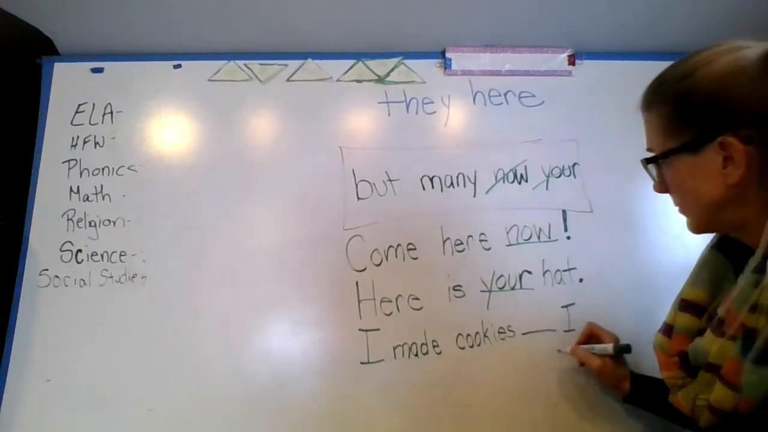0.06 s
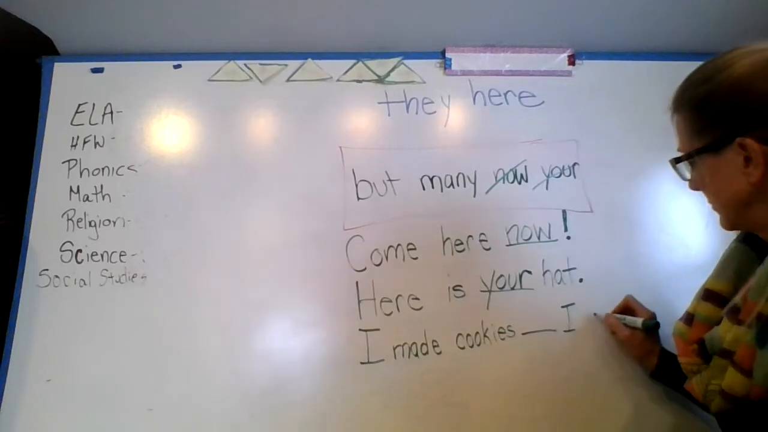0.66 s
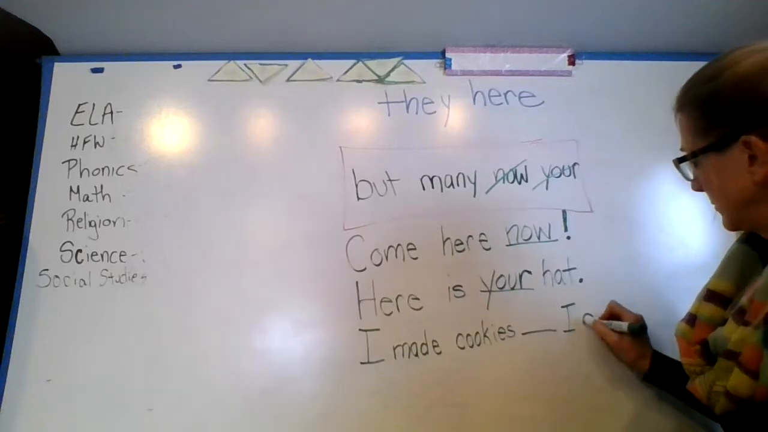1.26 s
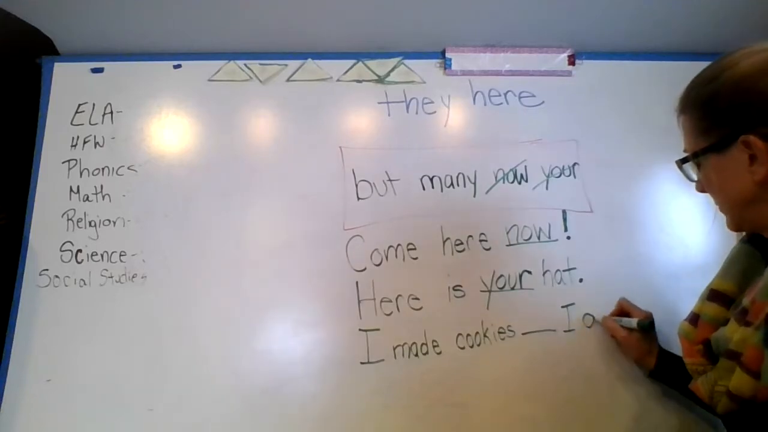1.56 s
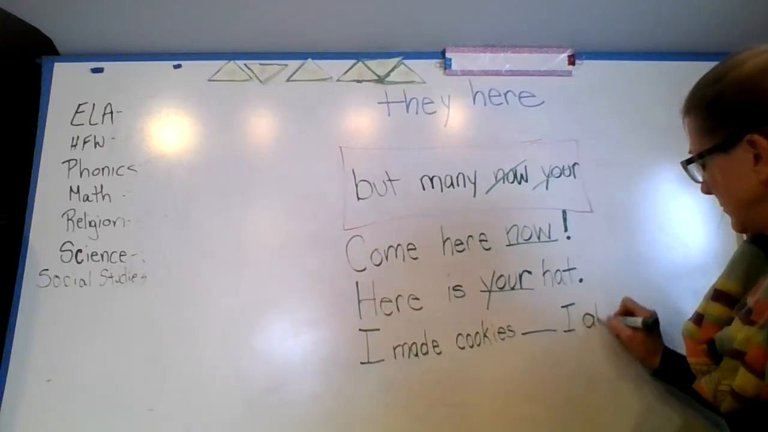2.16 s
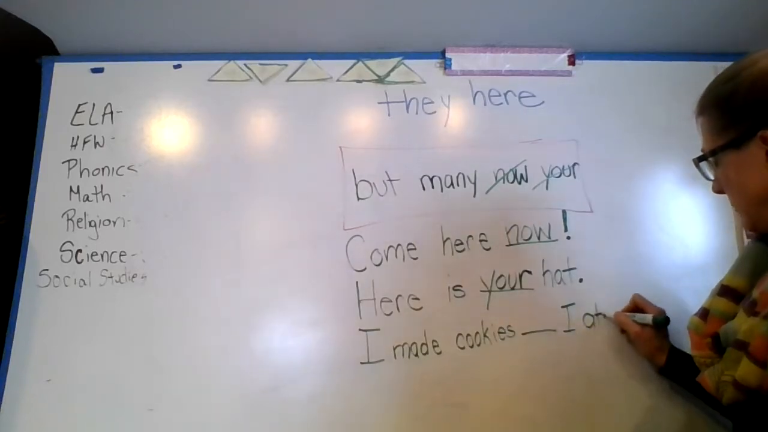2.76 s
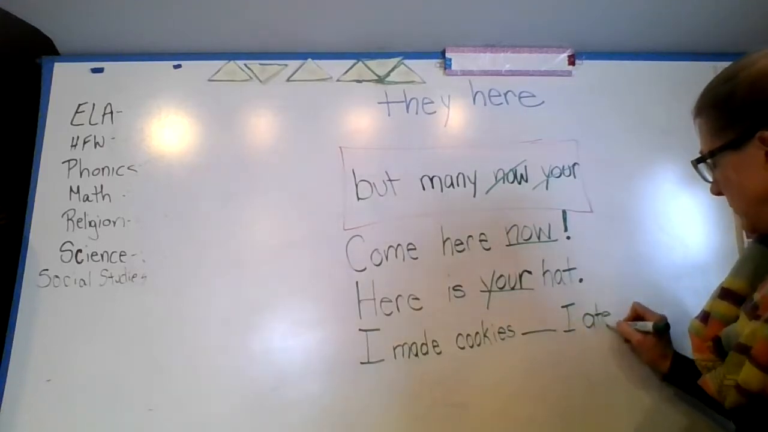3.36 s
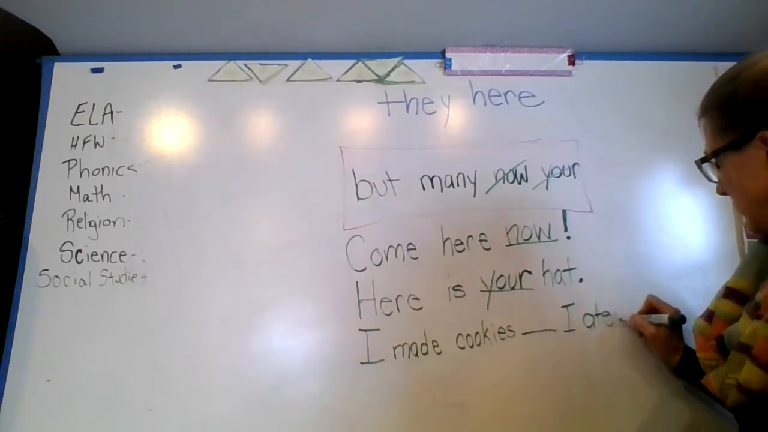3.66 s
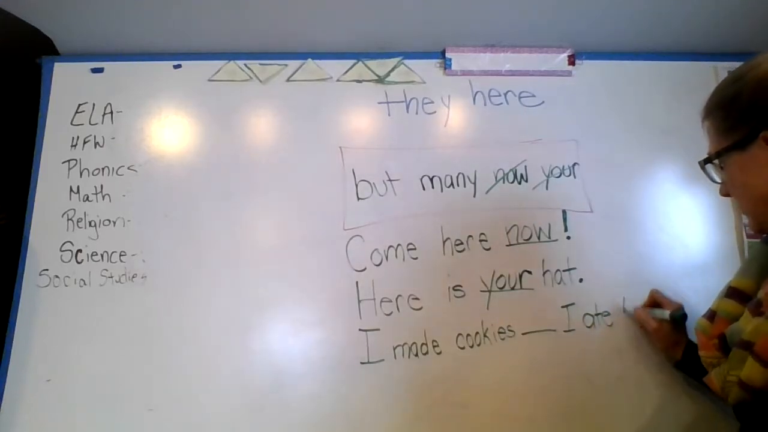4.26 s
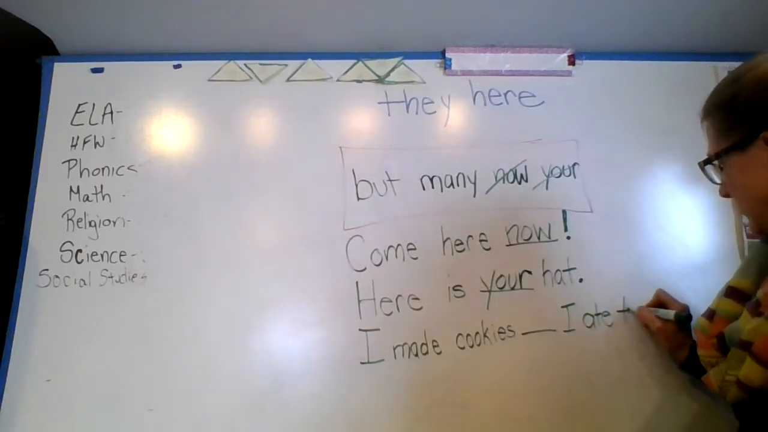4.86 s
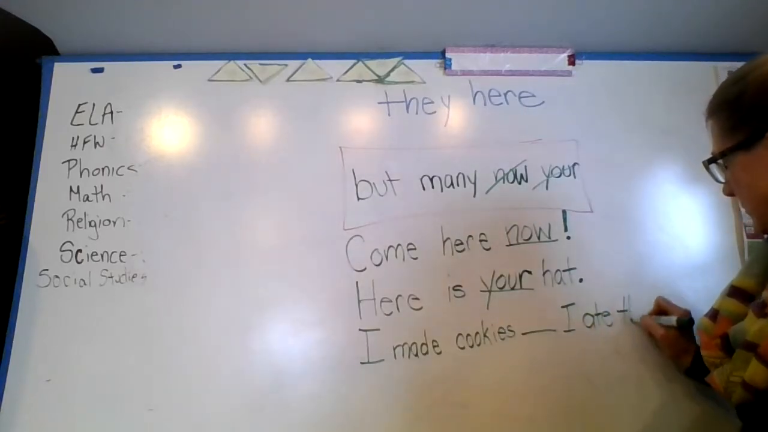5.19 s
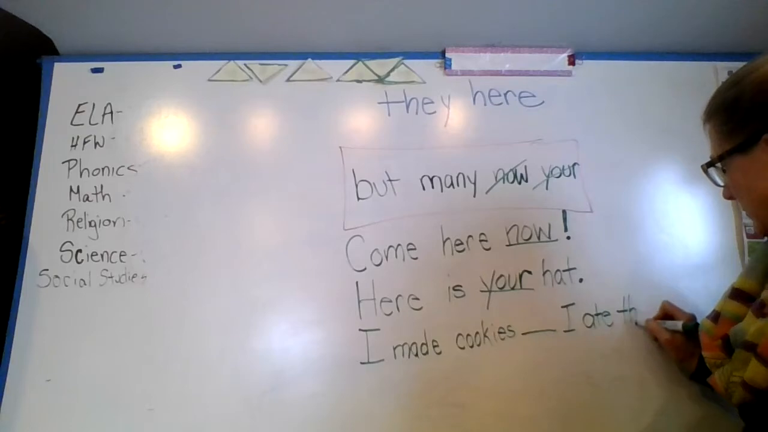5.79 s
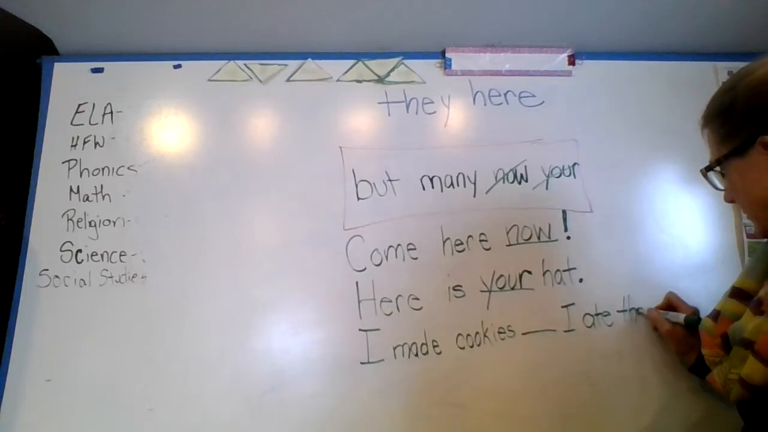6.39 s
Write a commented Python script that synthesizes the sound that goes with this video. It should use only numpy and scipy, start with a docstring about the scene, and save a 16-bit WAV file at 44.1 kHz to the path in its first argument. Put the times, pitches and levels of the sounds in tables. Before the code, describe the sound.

Soft knocks, felt-tip scratching and thin squeaks come from a marker writing on a whiteboard, against quiet room rumble and hiss.

```python
"""A dry-erase marker writes a few letters on a wall whiteboard, heard through a small microphone.
Over low room rumble and microphone hiss, a faint swell of background hiss near 2.5 kHz opens. The felt
tip rubs through a first stroke and catches with a tick. At 0.7 s a landing thumps the panel and a thin
stick-slip squeak follows. Strokes, landings and squeaks run on, the hand brushing and bumping the board;
at 4.7 s the tip lifts with a click, and the last stroke brakes at about 6.4 s."""
import sys
import numpy as np
from scipy import signal
from scipy.fft import rfft, irfft, next_fast_len
from scipy.io import wavfile

SR = 44100
rng = np.random.default_rng(int(sys.argv[2]) if len(sys.argv) > 2 else 0)


def int16_out(signal):
    """Quantize to a 16-bit WAV file."""
    q = np.round(np.clip(np.atleast_2d(signal).T, -1, 1) * 32767)
    wavfile.write(sys.argv[1], SR, q.astype(np.int16))


N = 287973
TIME = np.arange(N) / SR


def amp(db):
    return 10 ** (np.asarray(db) / 20)


def unit_rms(x):
    return x / np.sqrt(np.mean(x ** 2) + 1e-20)


def curve_at(points, hz):
    """Joins (f/Hz, value) breakpoints on a log-frequency axis."""
    f, value = np.transpose(points)
    return np.interp(np.log(hz + 1), np.log(f + 1), value)


def equalise(x, points):
    """Shapes x with an EQ curve, at rms 1."""
    size = next_fast_len(N)
    gain = amp(curve_at(points, np.fft.rfftfreq(size, 1 / SR)))
    return unit_rms(irfft(rfft(x, size) * gain, size)[:N])


def wander(hz):
    """A random LFO of rms 1, moving mostly below hz."""
    knots = rng.standard_normal(size=4096)
    return unit_rms(np.interp(2 * hz * TIME, np.arange(len(knots)), knots))


def resonate(x, hz, width_hz):
    """One resonance applied twice for steep skirts, at rms 1."""
    pole = np.exp((2j * np.pi * hz - np.pi * width_hz) / SR)
    return unit_rms(signal.lfilter([1], np.poly([pole, pole]), x).real)


def swell(peak_s, rise_s, fall_s, sharpness=1.29):
    """An envelope from rest up to 1 and back to rest."""
    return np.interp(TIME, [peak_s - rise_s, peak_s, peak_s + fall_s], [0, 1, 0]) ** sharpness


def add(mix, start_s, sound):
    part = mix[max(round(start_s * SR), 0):][:len(sound)]
    part += sound[:len(part)]


# EQ curves of the room rumble and the microphone hiss: f/Hz, gain/dB
RUMBLE_EQ = [(15, -5), (30, 2), (47, 1), (70, -8), (92, -5.5), (115, -15), (145, -20.5), (170, -30.5),
             (215, -39.5), (270, -25), (400, -28.5), (700, -34.5), (2000, -50.5)]
HISS_EQ = [(100, -7), (400, -6), (1000, 2.5), (1900, 2.5), (2700, 2.5), (3600, 0.5), (6000, 0.2),
           (11000, 0.5), (15500, 2)]


def room_tone(rumble_db=-55.0, hiss_db=-69.5, waver_db=1.43):
    """The bed: a low rumble that wavers slightly in level, under the microphone's even hiss."""
    rumble = equalise(rng.standard_normal(N), RUMBLE_EQ) * amp(waver_db * wander(hz=4.5))
    hiss = equalise(rng.standard_normal(N), HISS_EQ)
    return amp(rumble_db) * rumble + amp(hiss_db) * hiss


# a swell of background hiss (first row), then hand slides: peak t/s, half length/s, level/dB, centre f/Hz
NOISE_SWELLS = [(.35, .4, -82.5, 2470), (.9, .2, -85, 740), (2.8, 0.5, -78, 646), (5.28, 0.42, -76, 842),
                (6.088, 0.37, -76, 755)]


def soft_swells(relative_width=0.99):
    """Broad noise: the background hiss lifts faintly near 2.5 kHz; later, hand and sleeve brush by."""
    out = np.zeros(N)
    for peak_s, half_s, db, hz in NOISE_SWELLS:
        band = resonate(rng.standard_normal(N), hz, relative_width * hz)
        out += amp(db) * swell(peak_s, half_s, half_s) * band
    return out


# decay of the room by band: f/Hz, t60/s
ROOM_DECAY = [(60, 0.47), (140, 0.92), (300, 0.24), (600, 0.23), (2000, 0.33), (8000, 0.16)]


def room_reverb(x, fade_in_s=0.026):
    """The room answers with a diffuse tail, each band dying at its own speed."""
    hz, t, bands = signal.stft(rng.standard_normal(SR), SR, nperseg=512)
    decay = amp(-60 * t / curve_at(ROOM_DECAY, hz)[:, None])
    tail = signal.istft(bands * decay, SR, nperseg=512)[1]
    tail *= np.minimum(np.arange(len(tail)) / SR / fade_in_s, 1) ** 2
    return signal.fftconvolve(x, tail / np.linalg.norm(tail))[:N]


def fibre_snaps(per_s, spread_db):
    """Felt fibres snap free one after another: a dense grain of tiny, uneven clicks."""
    size = amp(spread_db * np.minimum(rng.exponential(1, N), 4))
    return size * rng.standard_normal(N) * (rng.random(N) < per_s / SR)


def shifting_ring(x, modes, swing_db=3):
    """Resonances take turns at random, as when the tip changes angle and place."""
    return unit_rms(sum(amp(db + swing_db * wander(hz=9)) * resonate(x, hz, width_hz)
                        for hz, width_hz, db in modes))


# the few pitches at which the tip can stick and slip
LOWEST_HZ, LOW_HZ, MID_HZ, HIGH_HZ, TOP_HZ = 2443, 2880, 6200, 8000, 10020
STROKES = [(.48, .12, -77.5, -95, None), (.8, 0.14, -86, -76.5, LOWEST_HZ), (.91, .11, -75, -74.5, LOW_HZ),
           (1.001, 0.084, -77.5, -79, HIGH_HZ), (1.145, 0.088, -68.5, -86, HIGH_HZ),
           (1.38, 0.2, -72, -80, HIGH_HZ), (1.935, 0.25, -73, -77, TOP_HZ), (2.33, 0.19, -82, -76, None),
           (2.709, .05, -80, -75, None), (2.85, 0.097, -86, -75.5, None),
           (3.008, .1, -73.5, -80.5, LOWEST_HZ), (3.11, 0.12, -78, -76, None),
           (3.194, 0.072, -74.5, -80, None), (4.065, 0.25, -71, -78, MID_HZ), (4.49, 0.14, -80, -75, None),
           (4.921, .22, -71.5, -78, MID_HZ), (5.285, 0.12, -75, -82, MID_HZ),
           (5.495, 0.17, -69.5, -85, None), (5.86, 0.1, -77.5, -72.5, MID_HZ),
           (6.15, 0.16, -74, -85.5, TOP_HZ), (6.254, 0.12, -79, -75.5, TOP_HZ),
           (6.335, 0.045, -77, -77.5, None)]
# EQ curves of the panel's rub and the felt's hiss: f/Hz, gain/dB
PANEL_EQ = [(150, -7), (350, 3), (680, 4.5), (950, -2.5), (1250, 4.5), (1500, -3), (1750, -6.5), (2500, -3),
            (3300, -7.5), (4100, -2), (5200, -5.5), (9000, -8)]
FELT_EQ = [(2000, -6.5), (4000, -5), (5200, -9), (6200, -5.5), (7000, -5), (7900, -4), (9000, -2.5),
           (9900, -6.5), (11000, -4), (12500, -23), (14200, -4.5), (16000, -13)]
# resonances that rubbing excites in the panel's skin and the marker: f/Hz, width/Hz, relative level/dB
SKIN_MODES = [(650, 180, 3), (973, 205, 1.5), (1502, 120, 2), (2034, 114, 0.5), (2550, 49, -5),
              (2880, 380, -3.5), (4070, 360, -16)]
MARKER_MODES = [(6440, 290, -12), (7750, 240, -2.5), (8470, 240, -7.5), (9340, 290, -2), (9950, 900, 0.5)]


def felt_rubbing(panel_trim_db=1.4, felt_trim_db=1.0, skin_db=-4, marker_db=-10, judder_db=0.9,
                 brake_s=0.074, panel_lag_s=.012):
    """Each stroke speeds up and brakes; the fibres hiss, ring the marker and drive the panel."""
    panel_power, felt_power = np.zeros((2, N))
    for peak_s, run_up_s, felt_db, panel_db, _ in STROKES:
        panel_speed = swell(peak_s + panel_lag_s, run_up_s, brake_s)
        felt_speed = swell(peak_s, run_up_s, brake_s)
        panel_power += (amp(panel_db + panel_trim_db) * panel_speed) ** 2
        felt_power += (amp(felt_db + felt_trim_db) * felt_speed) ** 2
    grain = fibre_snaps(per_s=8000, spread_db=0.5) * amp(judder_db * wander(hz=58.7))
    panel = equalise(grain, PANEL_EQ) + amp(skin_db) * shifting_ring(grain, SKIN_MODES)
    felt = equalise(grain, FELT_EQ) + amp(marker_db) * shifting_ring(grain, MARKER_MODES)
    return np.sqrt(panel_power) * panel + np.sqrt(felt_power) * felt


def tick(db, hz, t60, relative_width=0.52):
    """The tip jumps: a burst of band noise with a hard attack and a fast decay."""
    t = np.arange(SR // 8) / SR
    return amp(db - 60 * t / t60) * resonate(rng.standard_normal(len(t)), hz, relative_width * hz)


def tip_catches(boost_db=5):
    """The tip catches at each stroke's top speed: a bright tick that scales with the felt's hiss."""
    out = np.zeros(N)
    for peak_s, _, felt_db, _, _ in STROKES:
        add(out, peak_s, tick(felt_db + boost_db, hz=5840, t60=0.029))
    return out


def catch_pushes(boost_db=6.5, softness_s=0.00072):
    """Each catch also pushes the panel, with a force that scales with the rub."""
    return [(peak_s, panel_db + boost_db, softness_s) for peak_s, _, _, panel_db, _ in STROKES]


def force_pulses(pushes):
    """Bell-shaped pushes on the panel: the softer the contact, the duller the thump."""
    force = np.zeros(N)
    for at_s, db, softness_s in pushes:
        bell = np.exp(-.5 * ((TIME - at_s) / softness_s) ** 2)
        force += amp(db) * bell / bell.sum()
    return force


# the tip lands to begin a line, or lifts and lets the panel spring back: t/s, force level/dB, softness/s
LANDINGS = [(.655, -55.5, 0.001), (1.7668, -43.5, 0.00063), (2.187, -50, 0.00084), (2.5809, -44.5, 0.00085),
            (3.8769, -49, 0.00077), (4.364, -41.5, 0.00068), (4.7778, -43.5, 0.00067),
            (5.1587, -46.5, .001), (5.7296, -45, .001)]
LIFTS = [(4.6922, -57, 0.00055)]
# modes of the panel and low standing waves of the room: f/Hz, level/dB, free t60/s
PANEL_MODES = [(40.4, 2.5, 0.14), (61.6, 1.5, 0.79), (89.3, -1, 0.3), (107.2, -14.5, 0.47),
               (143.1, 2.46, .3), (185.3, -8.5, 0.27), (198.8, -5, 0.27), (225, -10.5, 0.21),
               (260.7, 0, 0.16), (274.2, -11.5, 0.35), (323.8, 1.4, .16), (348.3, 0.5, 0.32),
               (376, -5, 0.18), (429, -2, 0.15), (467, 2.5, 0.13), (492.3, 13, 0.097), (547, 4.5, 0.16),
               (604, 5.5, 0.2), (637, 13.5, 0.097)]
ROOM_MODES = [(132.63, -14, 1.1), (149.6, -9, 1), (99.3, -13.5, 0.54)]
# low notes of the panel's two opposite-signed faces, returned by nearby surfaces: delay/s, gain
REFLECTIONS = [(0.014, -0.75), (0.022, 0.48), (0.0339, -0.69), (0.0408, -0.22), (0.067, 0.17)]


def panel_thumps(reverb_db=-18, echo_cutoff_hz=253, felt_loss_db_per_s=120, felt_loss_hz=600,
                 boom_rise_s=0.13):
    """Landings, catches and bumps push the panel in, a lift lets it out; it rings and the room booms."""
    t = np.arange(SR) / SR
    ring = np.zeros(SR)
    for hz, db, t60 in PANEL_MODES:
        # the felt resting on the panel damps the high modes most
        fall_db_per_s = 60 / t60 + felt_loss_db_per_s * (hz / felt_loss_hz) ** 3
        ring -= amp(db - fall_db_per_s * t) * np.cos(2 * np.pi * hz * t)
    boom = sum(amp(db - 60 * t / t60) * np.sin(2 * np.pi * hz * t) for hz, db, t60 in ROOM_MODES)
    boom *= np.minimum(t / boom_rise_s, 1)
    force = force_pulses(LANDINGS) + force_pulses(hand_bumps() + catch_pushes()) - force_pulses(LIFTS)
    direct = signal.fftconvolve(force, ring)[:N]
    lows = signal.lfilter(*signal.butter(1, echo_cutoff_hz, fs=SR), direct)
    out = direct + amp(reverb_db) * room_reverb(direct) + signal.fftconvolve(force, boom)[:N]
    for delay_s, gain in REFLECTIONS:
        add(out, delay_s, gain * lows)
    return out


def contact_clicks(landing_trim_db=-27, lift_trim_db=-6.5):
    """The tip lands or lets go: a midrange click on top of the thump, scaled by its force."""
    out = np.zeros(N)
    for contacts, trim_db in (LANDINGS, landing_trim_db), (LIFTS, lift_trim_db):
        for at_s, force_db, _ in contacts:
            add(out, at_s, tick(force_db + trim_db, hz=1130, t60=0.048))
    return out


def tip_squeaks(level_db=-80.5, relative_width=0.037, run_up_share=0.68, overhang_s=0.027):
    """Friction feeds one narrow resonance of the tip: a thin whistle that dies as the stroke brakes."""
    out = np.zeros(N)
    for peak_s, run_up_s, _, _, hz in STROKES:
        if hz:
            lead_s = run_up_share * run_up_s
            length = round((lead_s + overhang_s) * SR)
            whistle = resonate(rng.standard_normal(SR)[:length], hz, relative_width * hz)
            add(out, peak_s - lead_s, amp(level_db) * whistle * signal.windows.tukey(length, .5))
    return out


def hand_bumps(span_s=(1.1, 4.2), per_s=2.2, force_db=-61, spread_db=1, softness_s=0.0012):
    """The side of the hand nudges the board: faint pushes, loose in timing and weight."""
    beats = np.arange(*span_s, 1 / per_s)
    jitter = rng.uniform(-1, 1, size=(64, 2))
    return [(beat_s + .5 * late / per_s, force_db + spread_db * hard, softness_s)
            for beat_s, (late, hard) in zip(beats, jitter)]


def scene(reverb_db=-10):
    """Mono mix: the light sounds with their reverb send, the thumps, and room tone underneath."""
    light = felt_rubbing() + tip_squeaks() + tip_catches() + contact_clicks() + soft_swells()
    return (panel_thumps() + light + amp(reverb_db) * room_reverb(light) + room_tone())[None]


def record(dry, cutoff_hz=15750, dc_offset=.1408):
    """A steep high cut, and the constant offset on which the converter's signal rides."""
    high_cut = signal.firwin(1023, cutoff_hz, window=("kaiser", 9), fs=SR)
    return signal.oaconvolve(dry, high_cut[None], "same") + dc_offset


dry = scene()
out = record(dry)
int16_out(out)
```